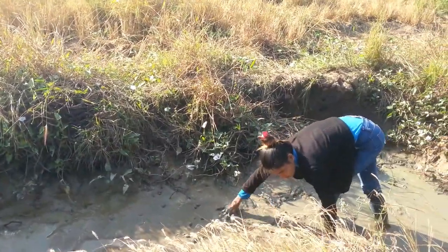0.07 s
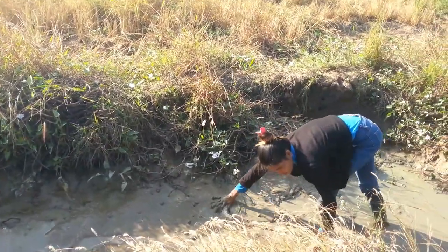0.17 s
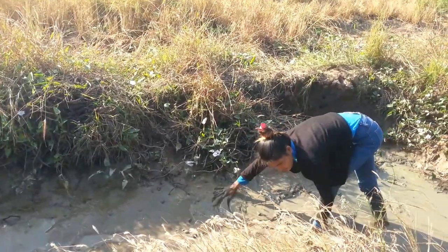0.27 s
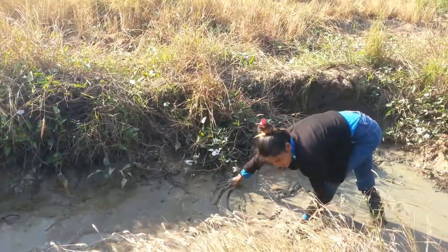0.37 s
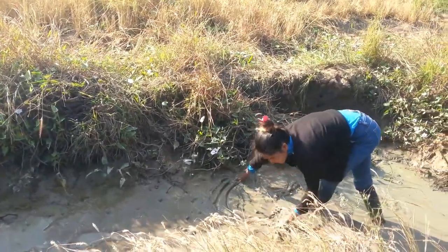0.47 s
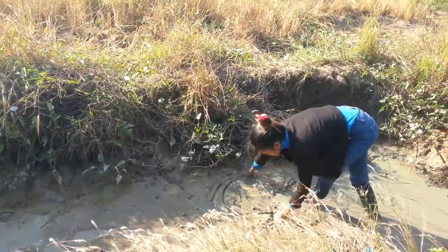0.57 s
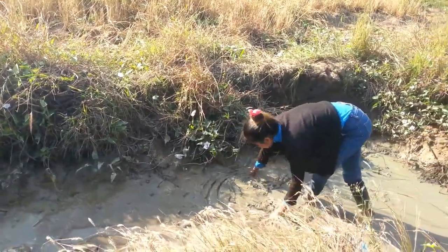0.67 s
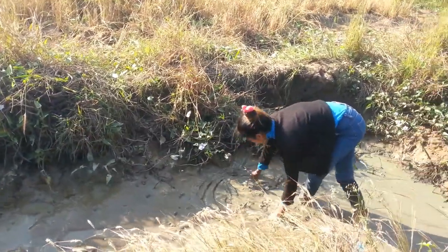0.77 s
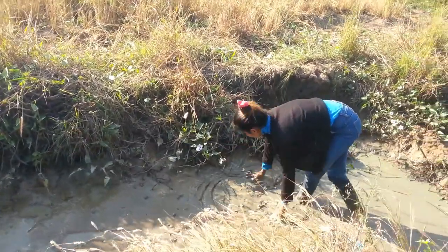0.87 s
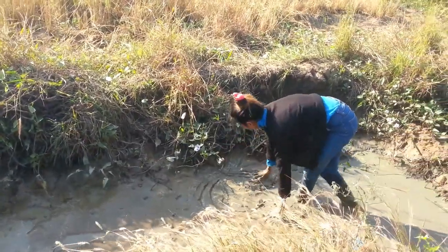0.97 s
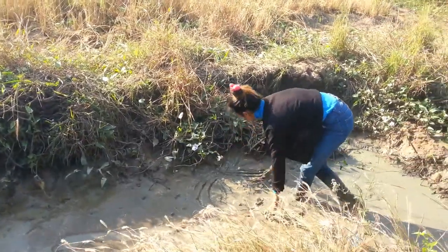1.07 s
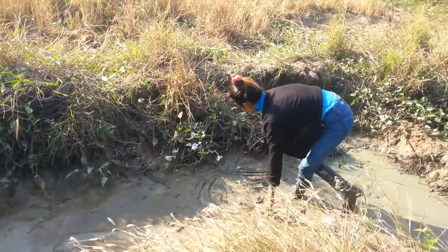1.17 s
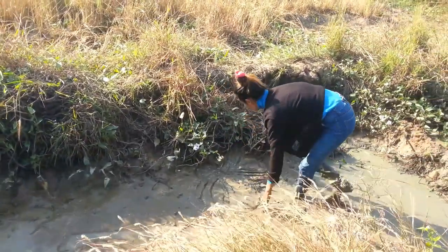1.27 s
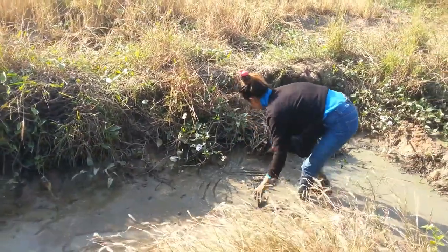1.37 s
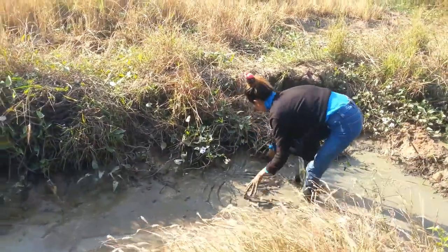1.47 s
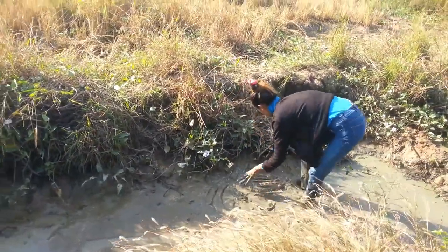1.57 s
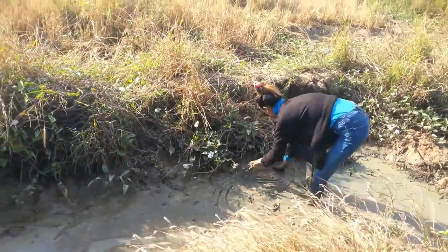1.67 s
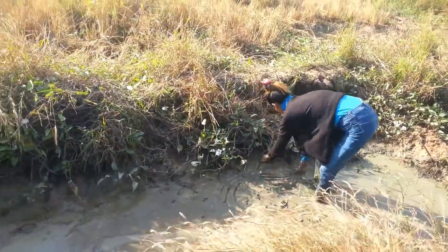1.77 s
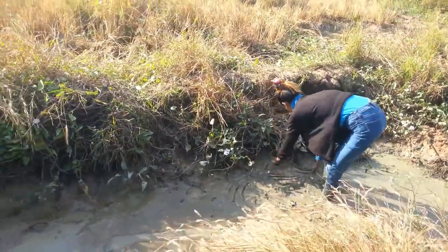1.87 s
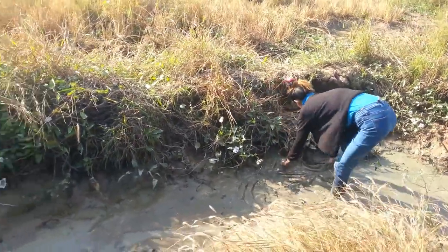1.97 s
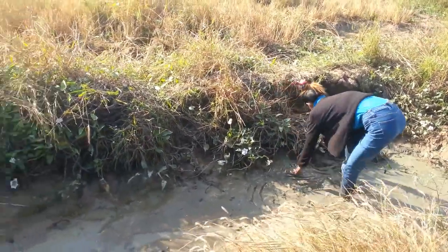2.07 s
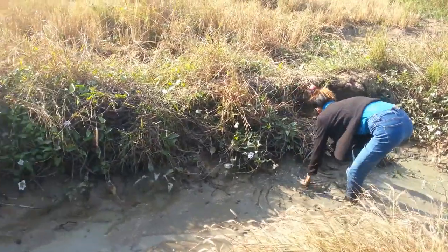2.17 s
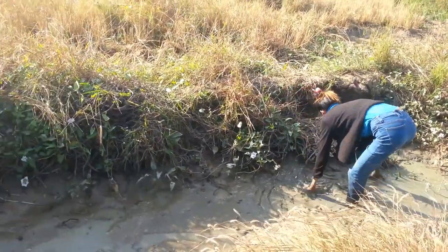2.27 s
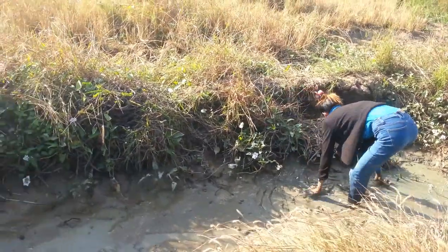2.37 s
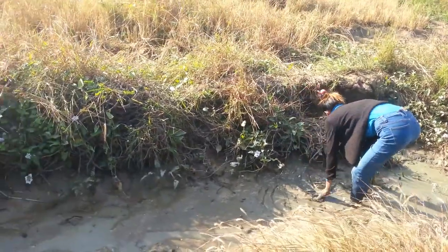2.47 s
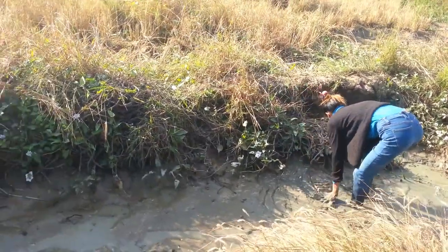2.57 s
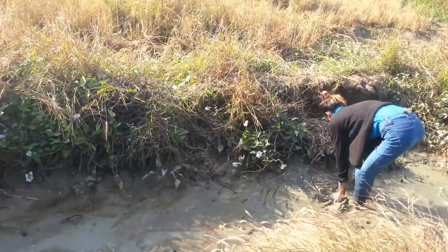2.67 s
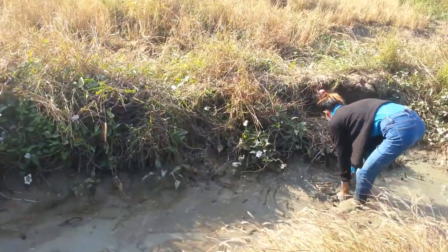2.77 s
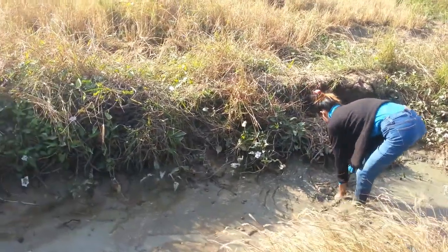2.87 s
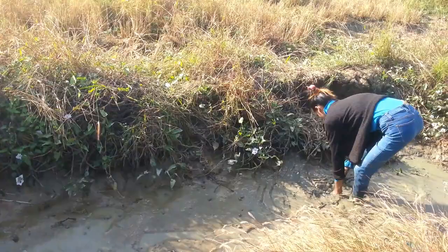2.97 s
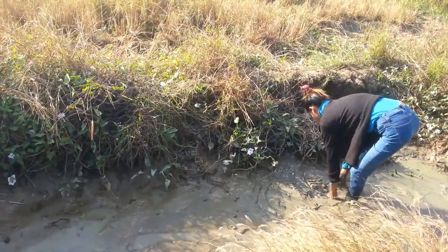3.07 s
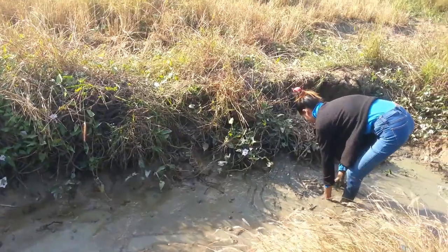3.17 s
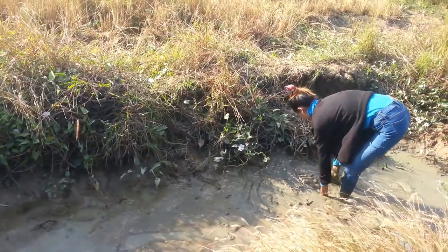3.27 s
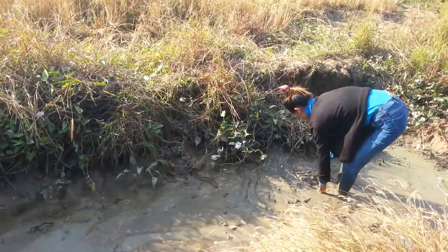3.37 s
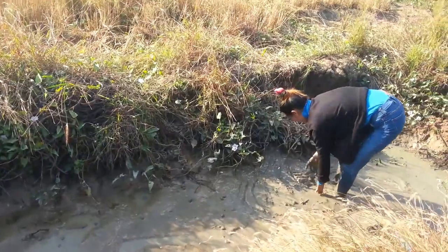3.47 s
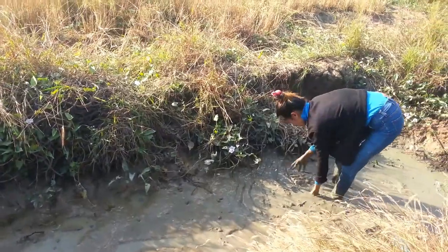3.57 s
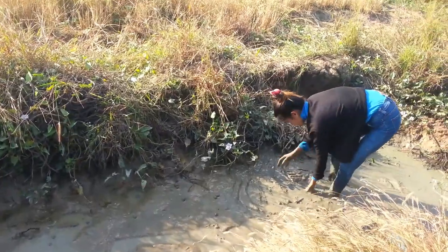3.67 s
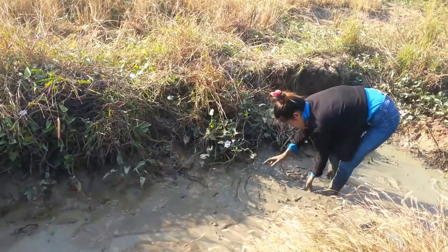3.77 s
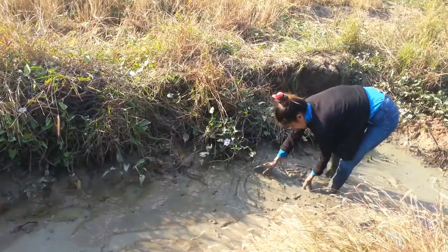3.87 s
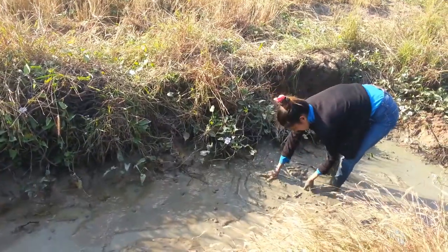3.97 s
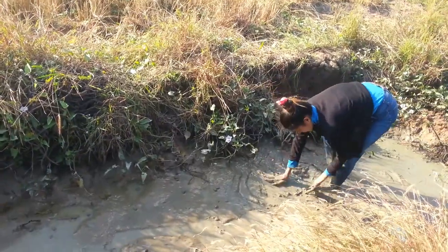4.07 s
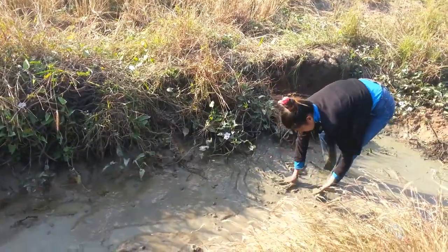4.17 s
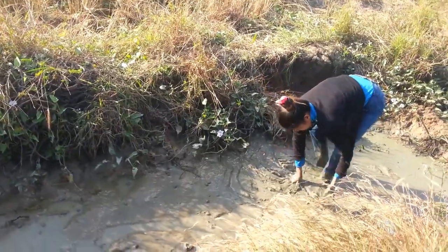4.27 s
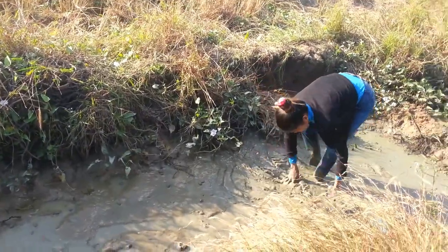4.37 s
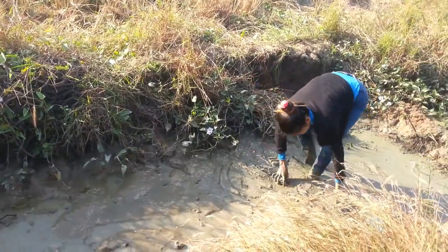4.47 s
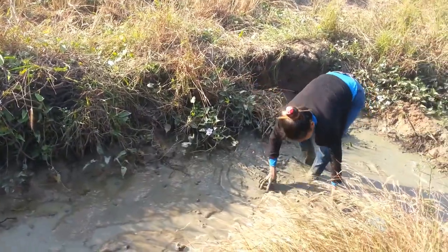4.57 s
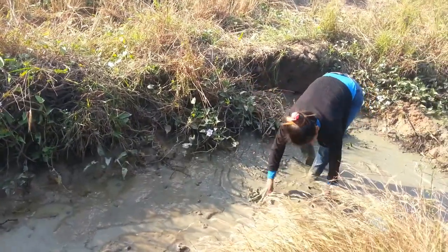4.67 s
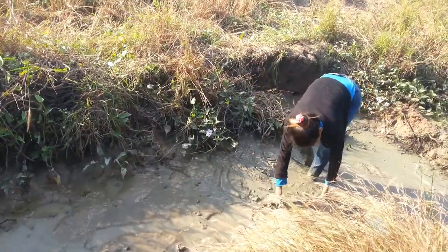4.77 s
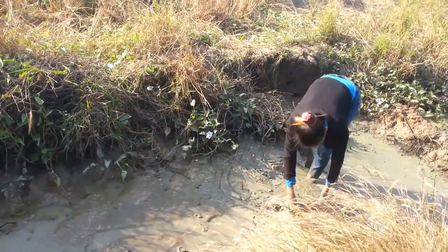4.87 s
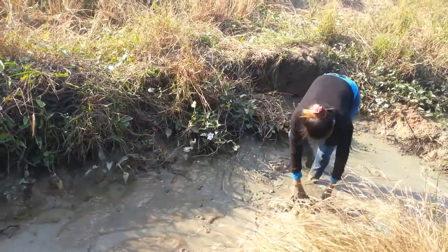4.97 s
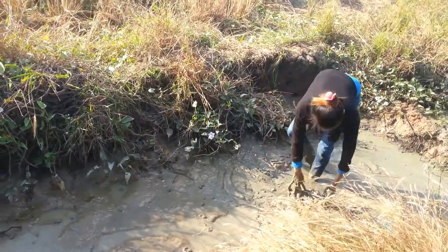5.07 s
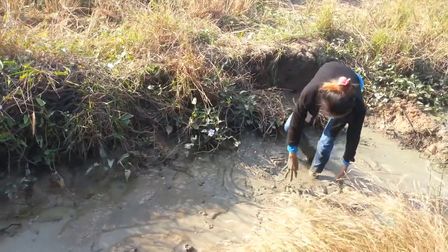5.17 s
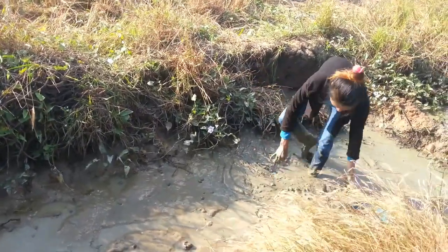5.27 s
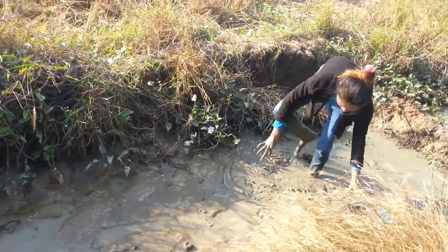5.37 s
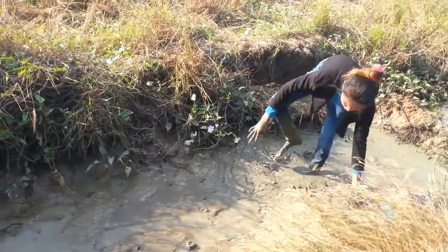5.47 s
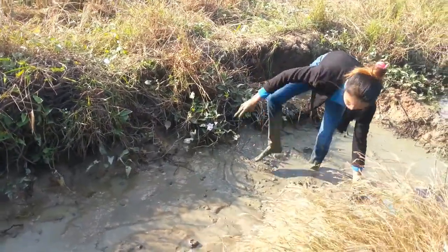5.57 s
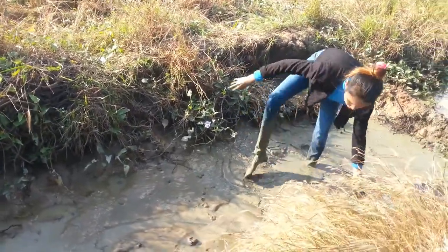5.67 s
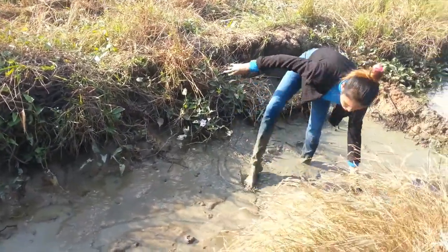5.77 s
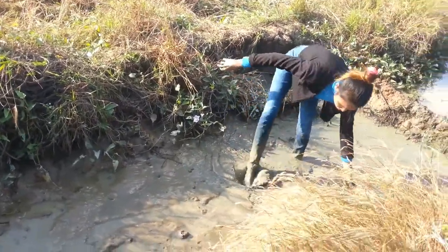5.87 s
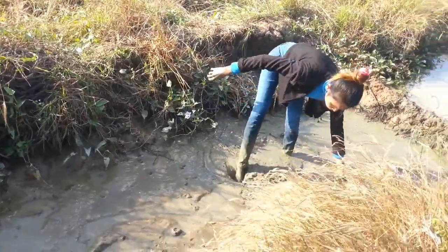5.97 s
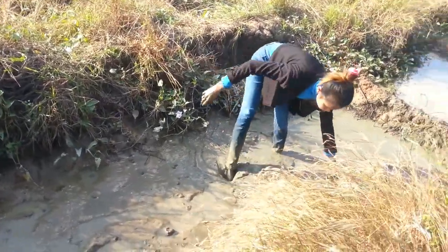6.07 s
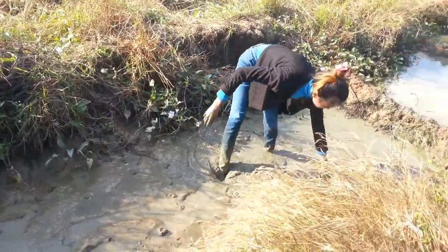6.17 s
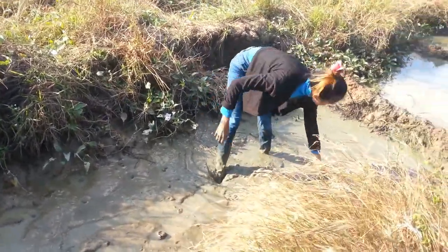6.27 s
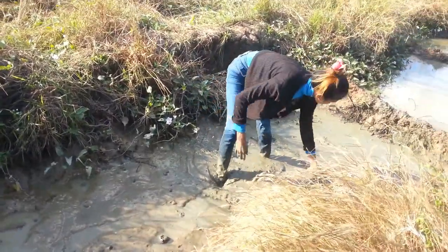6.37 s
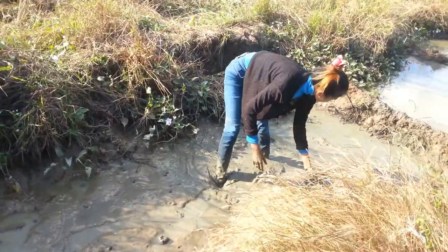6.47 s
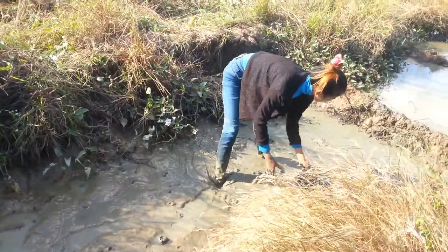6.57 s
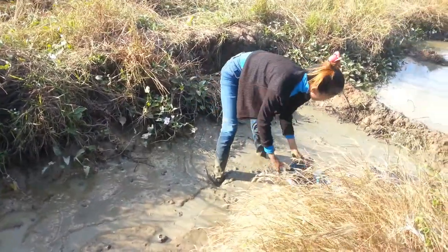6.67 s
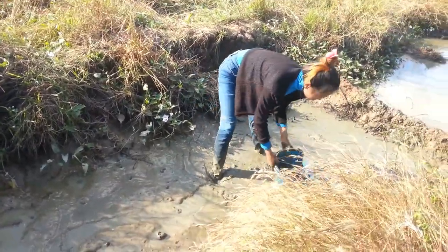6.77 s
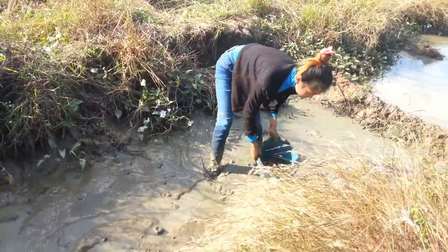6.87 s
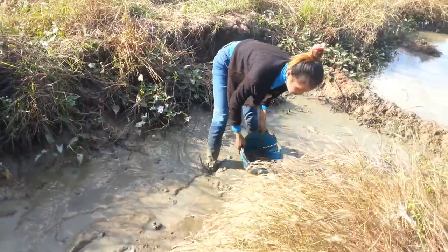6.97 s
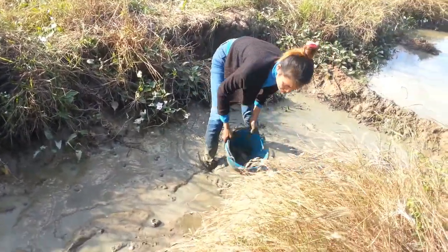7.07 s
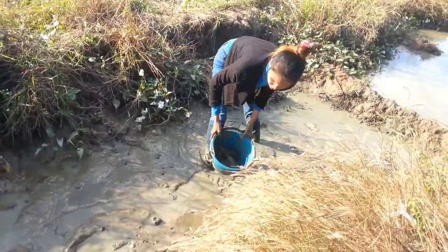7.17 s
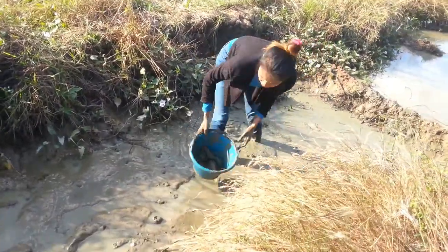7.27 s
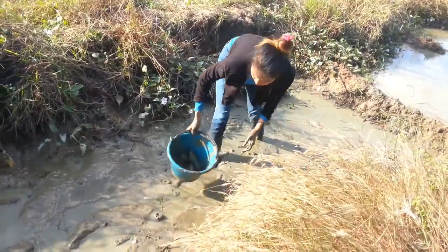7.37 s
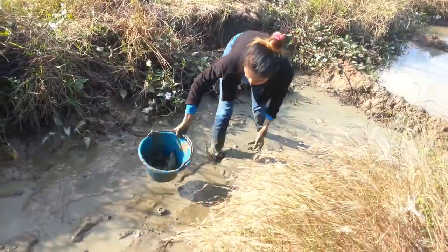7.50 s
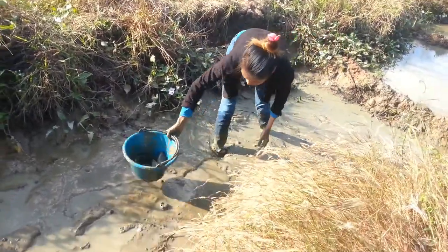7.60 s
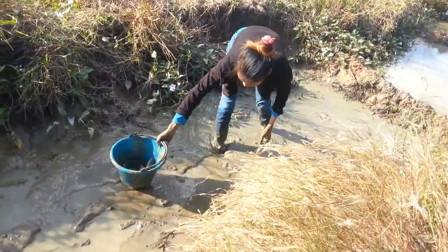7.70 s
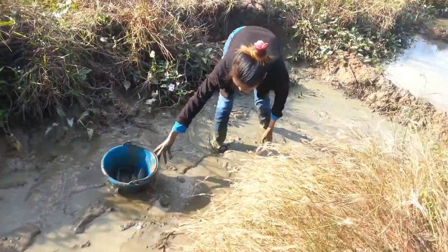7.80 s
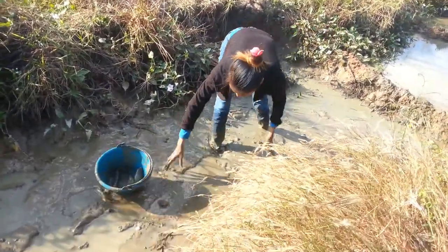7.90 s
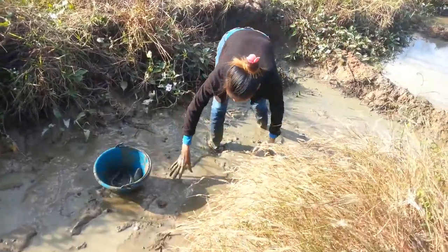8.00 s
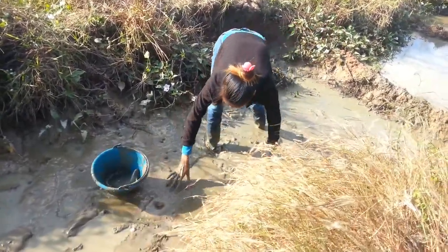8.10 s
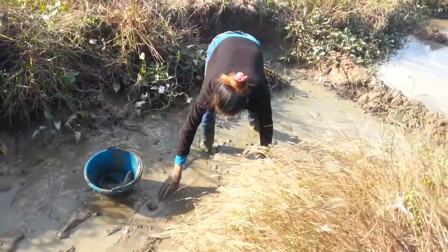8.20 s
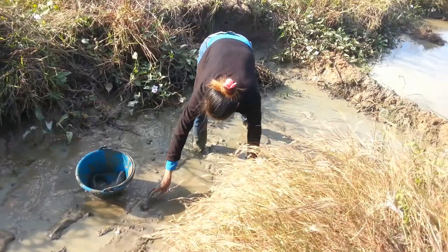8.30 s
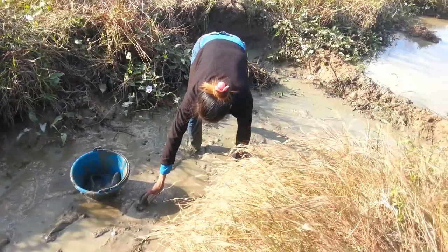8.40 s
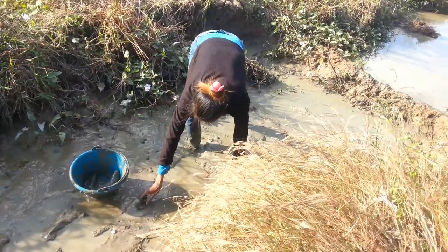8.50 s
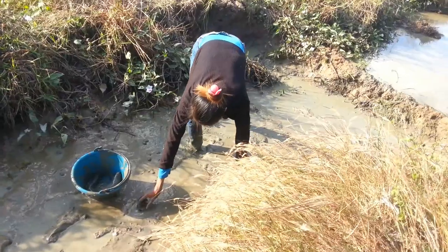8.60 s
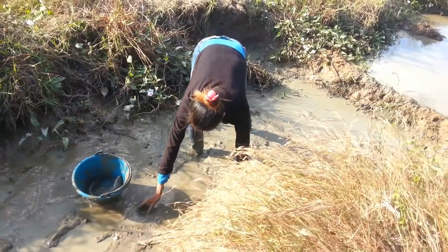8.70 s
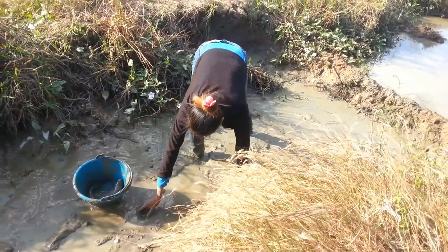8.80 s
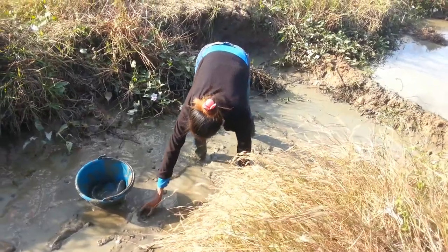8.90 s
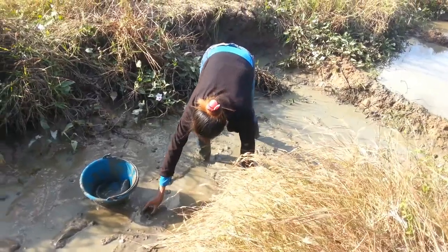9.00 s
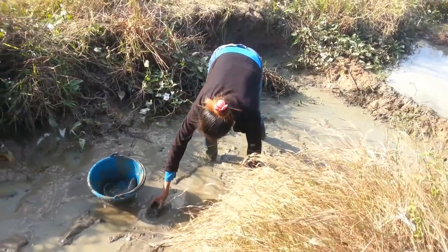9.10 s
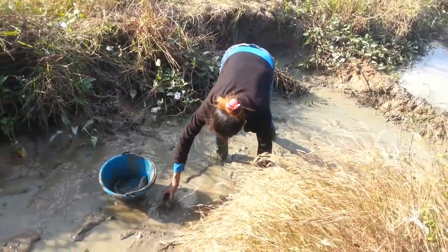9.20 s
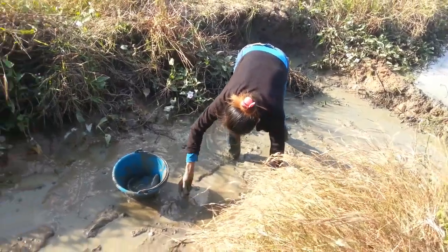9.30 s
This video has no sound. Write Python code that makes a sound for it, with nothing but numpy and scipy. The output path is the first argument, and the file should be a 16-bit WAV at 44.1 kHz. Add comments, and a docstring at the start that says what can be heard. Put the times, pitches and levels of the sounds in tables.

```python
"""Someone wades and gropes through the shallow mud of a drained pond, a few metres from a phone on the bank.
Air pockets ring and rise in pitch as they gulp open, suction squelches slide in pitch, bubbles chirp over
soft slosh, and wet mud spatters in short noise bursts; a plastic bucket's damped modes give a double smack.
Dry grass close to the phone rustles in gusts, as scraping noise, over a quiet outdoor hush of coloured noise."""
import sys
import numpy as np
from scipy import signal
from scipy.fft import rfft, irfft, next_fast_len
from scipy.io import wavfile
from scipy.ndimage import uniform_filter1d, minimum_filter1d

SR = 44100
rng = np.random.default_rng(int(sys.argv[2]) if len(sys.argv) > 2 else 0)


def wav_record(signal):
    """Record a signal, one row per channel, as 16-bit PCM in the file named by sys.argv[1]."""
    frames = np.transpose(np.atleast_2d(signal))
    bounded = np.clip(frames, -1, 1)
    # unit amplitude maps onto the largest positive 16-bit level
    quanta = np.round(bounded * 32767).astype(np.int16)
    wavfile.write(sys.argv[1], SR, quanta)


N = 411894
T = np.arange(N) / SR
EVENT_T = np.arange(8192) / SR  # time within one short sound [s]

# how hard the mud is being stirred: (time [s], relative level [dB])
STIR_EFFORT = [(0.0, -51.5), (0.36, -73), (0.55, -50), (1.2, -56), (1.43, -48.5), (1.74, -58.5),
               (2.55, -54.5), (2.76, -45), (3.8, -61), (4.08, -57), (4.32, -49), (4.71, -64), (5.23, -44.5),
               (5.59, -49.5), (6.58, -55), (6.81, -52), (7.52, -52.5), (7.83, -46.5), (8.4, -54.5),
               (8.97, -52.5), (9.34, -49)]


def undb(db):
    """Decibels to gain."""
    return 10 ** (np.asarray(db) / 20)


def unit(x):
    """Scale to rms 1."""
    return x / np.sqrt(np.mean(x ** 2))


def curve(rows):
    """Join (time [s], value) rows by straight lines."""
    return np.interp(T, *np.transpose(rows))


def colour(x, points, share=1):
    """Filter by a (frequency [Hz], gain [dB]) outline; share scales its decibels."""
    hz, db = np.transpose(points)
    size = next_fast_len(x.shape[-1])
    f = np.maximum(np.fft.rfftfreq(size, 1 / SR), 1)
    gain = undb(share * np.interp(np.log(f), np.log(hz), db))
    return irfft(rfft(x, size) * gain, size)[..., :x.shape[-1]]


def low_cut(x, hz):
    """Steep high-pass filter."""
    return signal.sosfilt(signal.butter(6, hz, "high", fs=SR, output="sos"), x)


def resonate(x, hz, q):
    """Two-pole resonance, kept to a workable pitch and sharpness."""
    hz = min(hz, SR / 3)
    q = max(q, 3 * hz / SR)
    return signal.lfilter(*signal.iirpeak(hz, q, fs=SR), x)


def envelope(rise_s, decay_s, hold_s=0):
    """Swell, hold and die away."""
    swell = np.minimum(EVENT_T / rise_s, 1) ** 2
    return swell * np.exp(-np.maximum(EVENT_T - rise_s - hold_s, 0) / decay_s)


def burst(shape, hz, q):
    """A crowd of tiny ruptures: noise in one band, with the energy of its envelope."""
    ruptures = rng.standard_normal(len(shape)) * shape
    band = resonate(resonate(ruptures, hz, q), hz, q)
    return unit(band) * np.sqrt(np.mean(shape ** 2))


def cavity(shape, hz, rough):
    """A cavity rings along a given pitch while its soft walls flutter in strength and phase."""
    flutter = unit(uniform_filter1d(rng.standard_normal((2, len(shape))), 56))
    phase = 2 * np.pi * np.cumsum(hz) / SR
    ring = shape * ((1 + rough * flutter[0]) * np.sin(phase) + rough * flutter[1] * np.cos(phase))
    return unit(ring) * np.sqrt(np.mean(shape ** 2))


def add(track, s, x):
    """Mix a sound in at time s."""
    i = max(int(s * SR), 0)
    track[i:i + len(x)] += x[:N - i]


def walk(rate):
    """Slow random drift about zero, with a new target rate times a second."""
    knots = rng.standard_normal(2048)
    return np.interp(T * rate, np.arange(len(knots)), knots)


def grains(rate, spread_db):
    """Random clicks, a few larger than the rest."""
    size = undb(spread_db * np.minimum(rng.exponential(size=N), 5))
    return unit((rng.random(N) < rate / SR) * size * rng.standard_normal(N))


def sway():
    """Relative grass level [dB]: each gust gains power steadily, then the stems settle; long gusts settle slowly."""
    # puffs of wind through the dry grass: (time [s], build-up [s], relative peak level [dB])
    gusts = [(-0.05, 0.02, -41.0), (0.32, 0.42, -37.5), (1.18, 0.32, -43.5), (1.94, 0.24, -47.5),
             (2.48, 0.34, -41), (3.1, 0.066, -43.5), (3.49, 0.1, -44.5), (3.99, 0.58, -35.0),
             (4.67, 0.11, -30.5), (4.9, 0.14, -31), (5.25, 0.14, -36.0), (5.42, 0.79, -42),
             (6.89, 0.25, -44.5), (7.45, 0.55, -44), (8.59, 0.13, -43), (9.01, 0.2, -38)]
    calm_db, fall_s = -52.5, 0.54  # level between gusts; fall after a gust that built for one second
    power = undb(calm_db) ** 2
    for s, build_s, db in gusts:
        settle = np.exp(-np.maximum(T - s - build_s, 0) / (fall_s * np.sqrt(build_s)))
        power = power + np.clip((T - s) / build_s, 0, 1) * (undb(db) * settle) ** 2
    return 10 * np.log10(power)


def stems():
    """Noise that flares for a few milliseconds each time two stems scrape, with fine clicks."""
    contacts = (rng.random(N) < 160 / SR) * rng.exponential(size=N)
    scrapes = signal.fftconvolve(contacts, envelope(rise_s=0.00022, decay_s=0.0037))[:N]
    return rng.standard_normal(N) * (1 + .4 * scrapes) + .4 * grains(rate=3000, spread_db=2)


def grass():
    """Dry grass rubs independently at each microphone port, brighter as it sways harder."""
    # spectrum of the rustle: (frequency [Hz], gain [dB])
    grass_colour = [(100, -97), (250, -37), (450, -8.5), (800, 0.5), (1400, -1.5), (2200, -5.5),
                    (3300, 0.5), (5100, 6), (6500, 3), (9500, 1.5), (14000, -8.5)]
    rub = np.array([stems(), stems()])
    sway_db = sway() + 1.0 * walk(rate=31)
    rustle = unit(colour(rub, grass_colour))
    sizzle = low_cut(rub, hz=6910) * undb(0.082 * (sway_db + 34) - 5)
    return (rustle + sizzle) * undb(sway_db - 1.5)


def hush():
    """Distant open country as steady noise; a broad low-middle band is shared by both ports."""
    # spectrum of the open air: (frequency [Hz], gain [dB])
    hush_colour = [(25, -2.5), (80, -6), (200, 1.5), (400, 5.5), (800, 4.5), (1400, 5.5), (2200, -1.5),
                   (4500, 2), (7000, 5.5), (10000, -7), (14500, -13.5)]
    shared = resonate(rng.standard_normal(N), hz=587, q=0.31)
    air = colour(rng.standard_normal((2, N)) + 0.68 * shared, hush_colour)
    return unit(air) * undb(-52.5 + 0.26 * walk(rate=1.7))


def stirring():
    """Small bubbles burst over a soft slosh as the hands grope about."""
    # spectrum of the slosh: (frequency [Hz], gain [dB])
    slosh_colour = [(150, -48), (400, -7.5), (850, 2), (1600, 4), (2400, -0.5), (5000, -56), (12000, -77)]
    bubbles = np.zeros(N)
    for when, pitch, size in rng.random((800, 3)):
        hz = 720 * 2.9 ** pitch
        shape = envelope(rise_s=0.00075, decay_s=1.66 / hz)
        # a bubble's pitch rises as it nears the surface
        chirp = np.sin(2 * np.pi * hz * EVENT_T * (1 + 9 * EVENT_T))
        add(bubbles, when * N / SR, undb(9.0 * size) * shape * chirp)
    slosh = colour(grains(rate=1800, spread_db=1.0), slosh_colour)
    effort = undb(curve(STIR_EFFORT) - 3 + 4.7 * walk(rate=23))
    return (undb(-5.0) * unit(bubbles) + undb(-2.0) * unit(slosh)) * effort


def snap(hz, decay_s):
    """A wet film breaks in a short bright burst."""
    return burst(envelope(rise_s=0.00058, decay_s=decay_s), hz, q=1.4)


def drips(count):
    """Small flung drops fall back at random, louder while the mud is stirred hard."""
    spread_db = 10.5  # from the smallest drop to the largest
    out = np.zeros(N)
    for when, pitch, size in rng.random((count, 3)):
        hz = 4500 * 2 ** (pitch - .5)
        add(out, when * N / SR, undb(spread_db * size ** 2) * snap(hz, decay_s=0.00049))
    effort_db = curve(STIR_EFFORT)
    # 0.32 dB louder for each dB of stirring above its mean
    return out * undb(-44 + 0.32 * (effort_db - effort_db.mean()))


def squelches():
    """Air is sucked through a wet gap in spurts; its resonance slides as the gap changes size."""
    # suction as a hand or boot pulls free:
    # (time [s], length [s], start pitch [Hz], end pitch [Hz], relative level [dB], raggedness [0-1])
    pulls = [(0.302, 0.031, 850, 1820, -45, 0.1), (1.269, 0.0072, 2120, 1910, -28, 0.34),
             (1.475, 0.0043, 2150, 1896, -26.5, 0.8), (2.598, 0.044, 1853, 1090, -43.5, 0.62),
             (5.033, 0.0073, 1255, 1130, -29, 0.2), (5.09, 0.019, 1990, 1680, -32.5, 0.42),
             (5.154, 0.039, 2087, 839, -38.5, 0.28), (5.333, 0.02, 1010, 860, -36, 0.4),
             (6.263, 0.023, 1140, 924, -43, 0.93), (6.678, 0.006, 1950, 1610, -38.5, 0.32),
             (7.288, 0.029, 1530, 1080, -47, 0.63), (7.779, 0.0084, 1160, 1040, -37.5, 0.25)]
    out = np.zeros(N)
    for s, length_s, start_hz, end_hz, db, ragged in pulls:
        shape = envelope(rise_s=0.0026, decay_s=0.0018, hold_s=0.97 * length_s)
        pitch = start_hz * (end_hz / start_hz) ** np.minimum(EVENT_T / length_s, 1) ** 1.6
        spurts, wobble = ragged * unit(uniform_filter1d(rng.standard_normal((2, len(shape))), 300))
        gap = cavity(shape * undb(4 * spurts), pitch * (1 + .1 * wobble), ragged)
        hiss = ragged * undb(-6) * burst(shape, start_hz, q=0.63)
        add(out, s, undb(db) * (gap + hiss))
    return out


def gulps():
    """Each pocket rises in pitch as it opens, with a dull splat of mud around it; low ones ring longest."""
    # the larger air pockets opening in the mud: (time [s], relative level [dB], nominal pitch [Hz])
    pockets = [(0.404, -33.5, 1830), (0.508, -31, 1000), (1.367, -27.5, 1920), (1.59, -32, 1700),
               (2.255, -32.5, 1810), (2.576, -37.5, 1330), (2.785, -28, 1430), (4.962, -26.5, 1190),
               (5.035, -27, 610), (5.087, -17.5, 1114), (5.113, -32, 1500), (5.26, -29, 876),
               (5.376, -28.5, 1140), (5.397, -26, 1087), (5.655, -40, 1320), (5.854, -32.5, 1098),
               (6.22, -37, 1530), (6.267, -35, 970), (6.653, -34, 1105), (6.676, -29, 870),
               (6.724, -34, 1005), (6.884, -32.5, 860), (7.947, -34.5, 986), (8.194, -29.5, 1650)]
    out = np.zeros(N)
    for s, db, hz in pockets:
        # a pocket dies away over the same number of cycles whatever its size
        shape = envelope(rise_s=0.0017, decay_s=6.4 / hz)
        pitch = hz * (.95 + 0.13 * (1 - np.exp(-EVENT_T / 0.015)))
        ring = cavity(shape, pitch, rough=0.18)
        splat = burst(shape, hz=1340, q=1.0)
        add(out, s, undb(db - 1) * (undb(-3.0) * ring + undb(-4.5) * splat))
    return out


def spatters():
    """A wet film snaps brightly and the mud under it answers with a low pat."""
    # wet slaps of hands and boots:
    # (time [s], relative snap level [dB], snap pitch [Hz], relative body level [dB], snap decay [s])
    slaps = [(0.506, -34, 5370, -39, 0.004), (0.6622, -24.5, 5100, -45, 0.0075),
             (0.8279, -13.5, 4800, -47, 0.00058), (1.008, -17.5, 4800, -34, 0.00076),
             (1.4064, -16, 4150, -64, 0.0007), (1.4791, -4, 4050, -31, 0.0011),
             (1.489, -18.5, 4710, -36, 0.0026), (1.522, -21.5, 3290, -53.5, 0.001),
             (1.6117, -22, 3450, -49, 0.00077), (2.146, -24.5, 4000, -44.5, 0.0015),
             (2.1652, -30, 3740, -43.5, 0.0012), (3.3129, -33, 3880, -39, 0.0038),
             (3.783, -16, 8700, -43, 0.0031), (3.9955, -26.5, 3930, -54, 0.0021),
             (4.5005, -16.5, 5100, -59, 0.0007), (4.7808, -12.5, 4790, -37, 0.00077),
             (4.993, -6.5, 5260, -30.0, 0.00058), (5.0271, -9, 5200, -43, 0.00065),
             (5.0783, -9.5, 6050, -30, 0.0015), (5.308, -10.5, 5100, -34.5, 0.00063),
             (5.514, -19, 5100, -30.5, 0.0031), (5.7207, -18, 5400, -54, 0.00064),
             (6.0343, -26.5, 4700, -46, 0.004), (6.3317, -23.0, 2690, -42.5, 0.00064),
             (7.1044, -20, 5170, -47, 0.0003), (8.1956, -24, 4670, -45, 0.0047),
             (8.2572, -16, 3450, -50, 0.00057), (8.4295, -23.5, 9500, -44.5, 0.00081),
             (8.802, -17, 2560, -52, 0.0013)]
    out = np.zeros(N)
    for s, snap_db, snap_hz, body_db, decay_s in slaps:
        pat = burst(envelope(rise_s=0.00062, decay_s=0.0026), hz=1300, q=0.65)
        add(out, s, undb(snap_db - 8.0) * snap(snap_hz, decay_s) + undb(body_db + 7.5) * pat)
    return out


def bucket():
    """The bucket slaps the mud twice; its damped modes boom and water sprays out as contact begins."""
    # the two blows on the mud: (time [s], relative level [dB], centre of excited modes [Hz],
    # width [octaves], contact [s], relative spray level [dB], spray pitch [Hz])
    landings = [(7.8124, -5.5, 835, 0.92, 0.0049, -21.5, 4430), (7.8373, -7, 1620, 0.63, 0.0024, -7, 3980)]
    # modes of the bucket and the air under it: (frequency [Hz], relative level [dB], decay [s])
    modes = [(340, 1.5, 0.00214), (383, 0.5, 0.0017), (886, -1, 0.0028), (1108, -18, 0.018),
             (1263, 2.5, 0.0012), (1563, -1.5, 0.0027), (1705, -12, 0.0021)]
    out = np.zeros(N)
    for s, db, centre_hz, octaves, contact_s, spray_db, spray_hz in landings:
        ring = 0
        for hz, mode_db, decay_s in modes:
            # a blow drives the modes near its centre hardest
            reach = np.exp(-.5 * (np.log2(hz / centre_hz) / octaves) ** 2)
            shape = envelope(rise_s=.0012, decay_s=decay_s, hold_s=contact_s)
            ring = ring + reach * undb(mode_db) * cavity(shape, np.full(len(shape), hz), rough=.3)
        slap = burst(envelope(rise_s=0.00096, decay_s=0.004, hold_s=contact_s), hz=3050, q=1)
        spray = burst(envelope(rise_s=.002, decay_s=.0025, hold_s=.0015), spray_hz, q=1.9)
        add(out, s, undb(db) * ring + undb(db - 10.5) * slap)
        add(out, s - .003, undb(spray_db) * spray)  # begins 3 ms ahead of the boom
    return out


def arrive(x, lag_s):
    """Sound from the right reaches the left port later."""
    return np.array([np.interp(T - lag_s, T, x), x])


def bank(x, db, decay_s):
    """The earth bank and its plants scatter a short, diffuse echo."""
    # spectrum of the echo: (frequency [Hz], gain [dB])
    bank_colour = [(100, -22), (400, 9), (700, 11), (1100, 1.5), (2000, 7.5), (5000, 4), (14000, 11)]
    scatter = rng.standard_normal((2, len(EVENT_T))) * envelope(rise_s=0.001, decay_s=decay_s)
    echo = unit(colour(scatter, bank_colour)) / np.sqrt(len(EVENT_T))
    return undb(db) * signal.fftconvolve(x[None], echo, axes=1)[:, :N]


def scene():
    """The wader is a little to the right, by the bank; the bucket lands nearer the middle, in the open."""
    # small pools and pockets radiate hardly any bass
    mud = low_cut(gulps() + squelches() + spatters() + drips(count=130) + stirring(), hz=300)
    smack = low_cut(bucket(), hz=277)
    direct = arrive(mud, lag_s=0.00021) + arrive(smack, lag_s=0.00014)
    echoes = bank(mud, db=-8, decay_s=0.0085) + bank(smack, db=-17, decay_s=0.017)
    return direct + echoes + grass() + hush()


def limit(x):
    """A fast limiter ducks both channels on the loudest peaks; what still passes full scale is clipped."""
    ceiling = 1.22  # in units of full scale
    gain = 1 / np.maximum(np.abs(x).max(axis=0) / ceiling, 1)
    smooth_gain = uniform_filter1d(minimum_filter1d(gain, size=241), size=241)
    return np.clip(x * smooth_gain, -1, 1)


def record(dry):
    """Each port has its own colour; the phone limits the loudest peaks and cuts the top."""
    # imbalance of the two microphone ports, scaled for each port below: (frequency [Hz], outline [dB])
    port_colour = [(300, 0), (1800, 1), (2400, -3), (2900, -1.5), (4000, -5), (5200, -10), (6300, -9),
                   (8000, -0.5), (9500, -3), (11500, 3), (14000, 1.5)]
    # response shared by both ports: (frequency [Hz], gain [dB])
    microphone = [(1000, 1.5), (1800, 5), (2400, 6.5), (3300, 6.5), (5500, 4), (6300, -1.5), (9000, 5),
                  (13500, 0.5)]
    left = colour(dry[0], port_colour, share=1.0)
    right = colour(dry[1], port_colour, share=-0.29)
    limited = limit(colour(np.array([left, right]), microphone))
    low_pass = signal.ellip(10, .2, 70, 14700, fs=SR, output="sos")  # ripple [dB], stopband [dB], edge [Hz]
    return signal.sosfilt(low_pass, limited)


dry = scene()
out = record(dry)
wav_record(out)
```